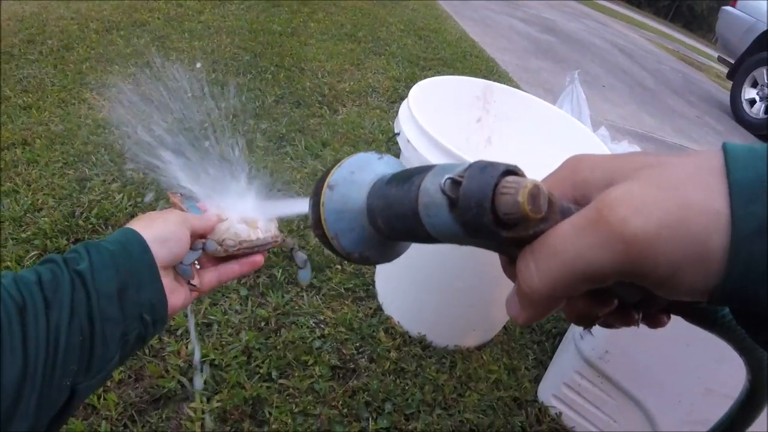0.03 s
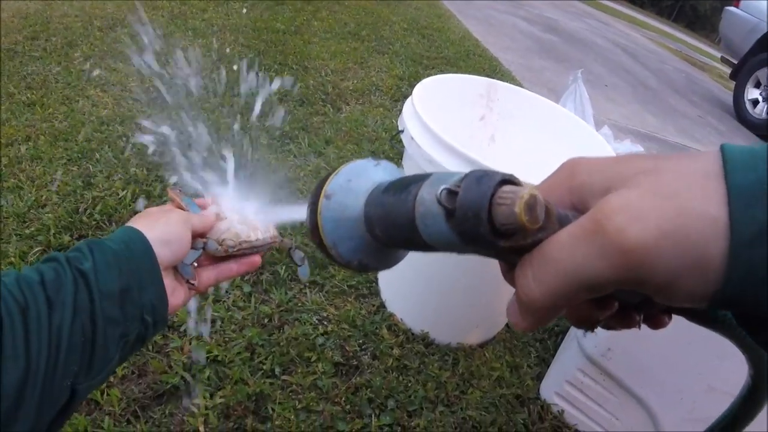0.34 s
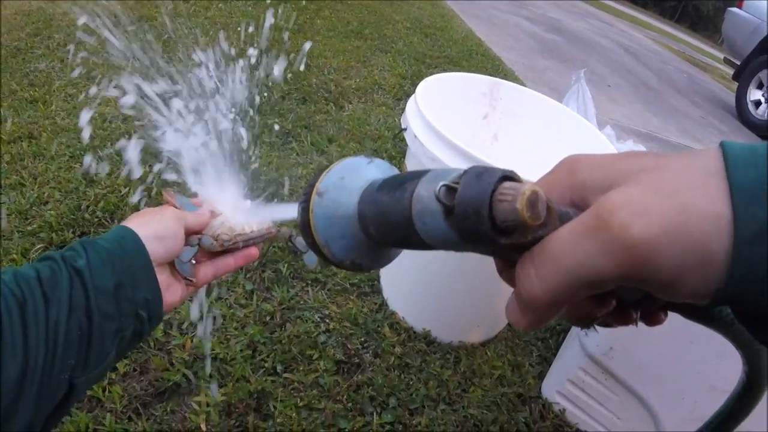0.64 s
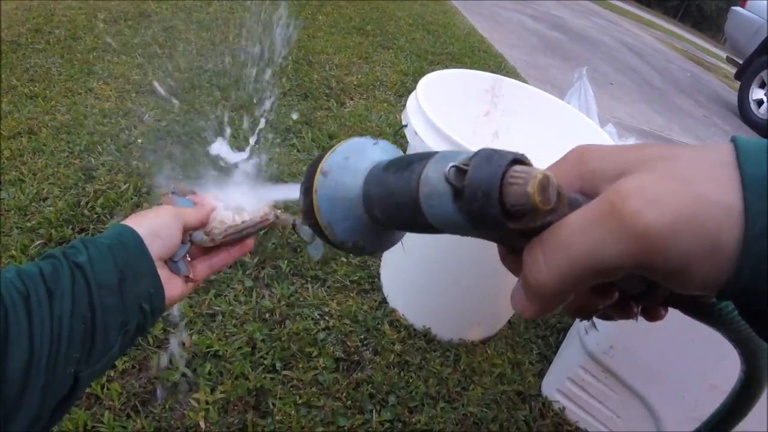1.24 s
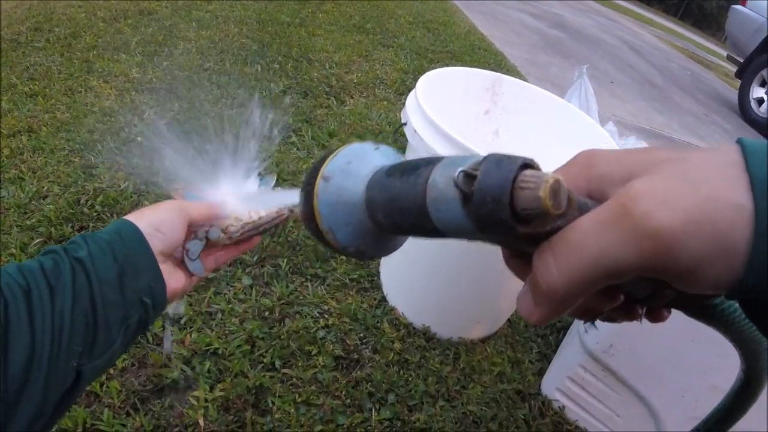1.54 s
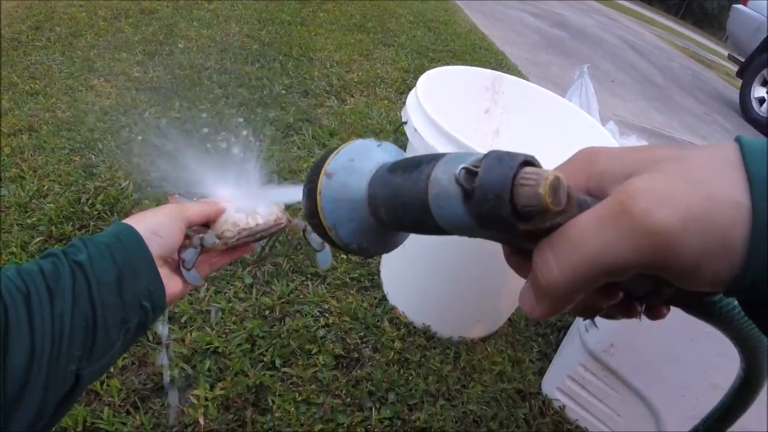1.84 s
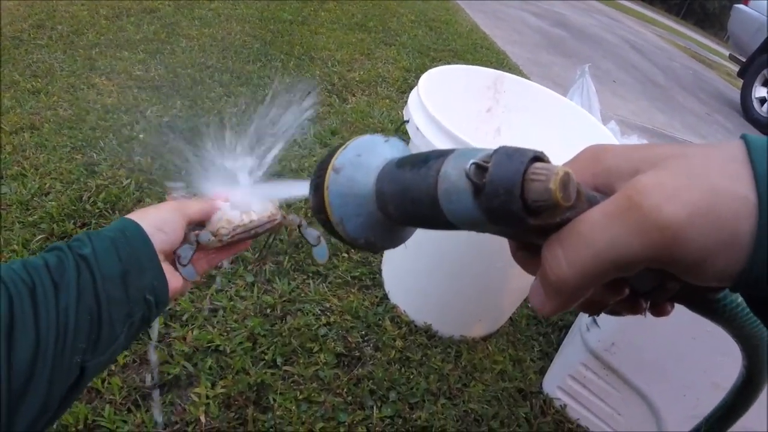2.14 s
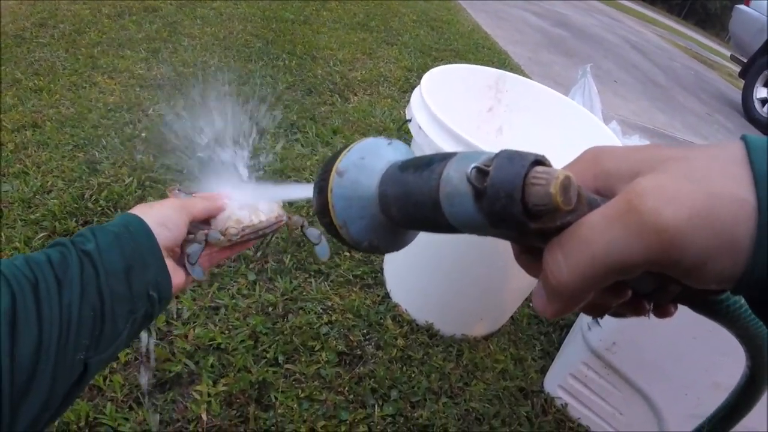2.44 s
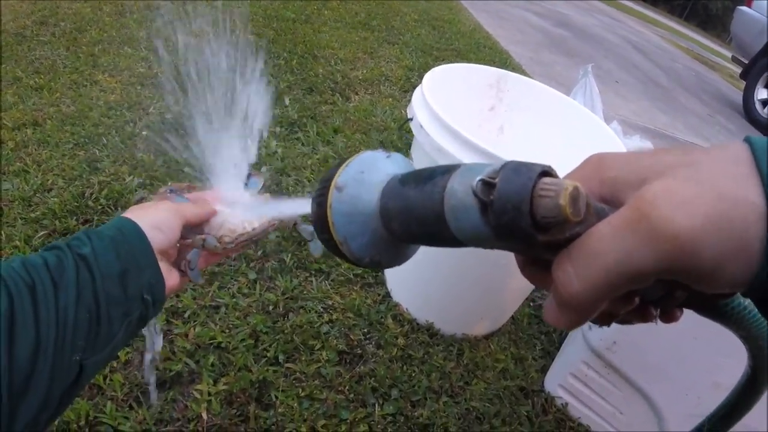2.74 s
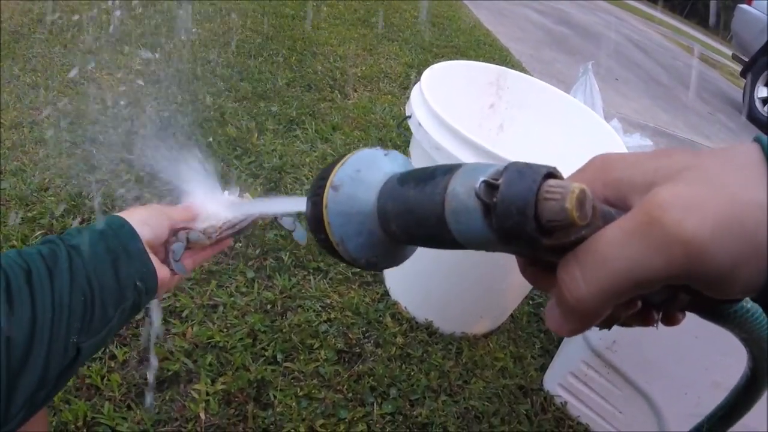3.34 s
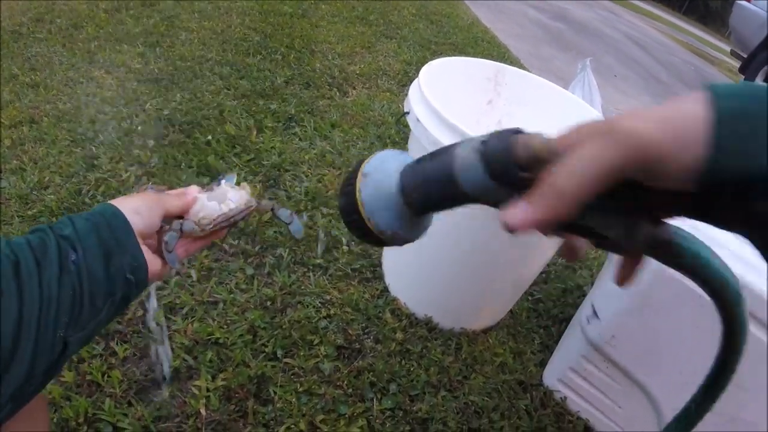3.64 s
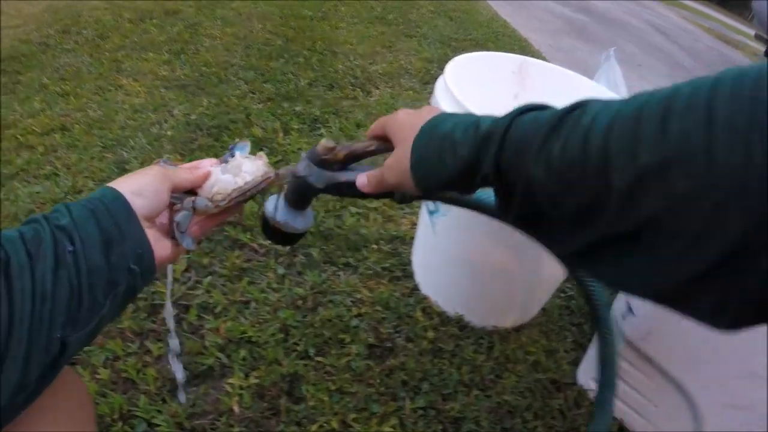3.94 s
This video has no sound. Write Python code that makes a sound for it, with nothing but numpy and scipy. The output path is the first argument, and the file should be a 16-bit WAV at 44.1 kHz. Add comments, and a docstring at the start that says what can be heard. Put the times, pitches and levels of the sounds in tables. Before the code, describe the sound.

Hissing hose water splatters on a crab shell outdoors, stopping with a dull knock.

```python
"""Hosing down a crab

A garden hose, close by, jets water onto a crab held in the hand above a lawn. Dense droplets sizzle
and splatter on the shell, and the sound sags whenever the wagging jet glances off it. Water slaps
the shell and gurgles in the cupped hand. The valve shuts, the handle knocks and the last water
drips away, over a low outdoor drone like a far idling engine. Mono."""
import sys
import numpy as np
from scipy import signal
from scipy.fft import rfft, irfft, next_fast_len
from scipy.io import wavfile
from scipy.ndimage import uniform_filter1d, map_coordinates

SR = 44100
rng = np.random.default_rng(int(sys.argv[2]) if len(sys.argv) > 2 else 0)


def master_out(mix):
    """Clip the mix to full scale and print it as 16-bit PCM to the path in sys.argv[1]."""
    frames = np.transpose(np.atleast_2d(mix))
    ceiling = np.clip(frames, -1, 1)
    pcm = np.round(ceiling * 32767).astype(np.int16)
    wavfile.write(sys.argv[1], SR, pcm)


N = 176400
TIME = np.arange(N) / SR
SHUT_S, TOP_HZ = 3.527, 15500  # when the valve shuts; where the treble ends


def amp(db):
    """Turn decibels into a gain."""
    return 10 ** (np.asarray(db) / 20)


def unit(x):
    """Scale a sound to an average (rms) level of 1."""
    return x / np.sqrt(np.mean(x ** 2) + 1e-20)


def wobble(rate):
    """A smooth random curve through `rate` points a second."""
    return map_coordinates(rng.standard_normal(int(N * rate / SR) + 4), [np.arange(N) * rate / SR])


def filtered(x, response):
    """Scale each frequency in x by response(hz)."""
    size = next_fast_len(N + SR // 2)
    return irfft(rfft(x, size) * response(np.fft.rfftfreq(size, 1 / SR)), size)[:N]


def coloured(x, points):
    """Give x a tone colour that follows (Hz, dB) points."""
    size = 4096
    hz, db = np.transpose(points)
    log_hz = np.log(np.fft.rfftfreq(size, 1 / SR) + 1)
    cepstrum = irfft(np.log(amp(np.interp(log_hz, np.log(hz), db))))
    cepstrum[1:size // 2] *= 2  # folded so the filter rings after a hit, never before
    cepstrum[size // 2 + 1:] = 0
    return signal.fftconvolve(x, irfft(np.exp(rfft(cepstrum))))[:len(x)]


def band(x, low_hz, high_hz, order=20):
    """The part of x between two frequencies, at an average level of 1."""
    below = lambda hz, edge: 1 / (1 + (hz / edge) ** order)
    return unit(filtered(x, lambda hz: below(hz, high_hz) - below(hz, low_hz)))


def droplets(rate, scatter_db, hiss_share):
    """Drops of random size land as clicks, about `rate` a second, over a smooth hiss."""
    size = amp(scatter_db * np.clip(rng.standard_normal(N), -2, 2)) * np.sign(rng.standard_normal(N))
    hits = unit(size * (rng.random(N) < rate / SR))
    return np.sqrt(1 - hiss_share) * hits + np.sqrt(hiss_share) * rng.standard_normal(N)


def bubbles(rate, pitch_hz, spread, cycles, scatter_db):
    """Bubbles ring at random times and pitches, each fading by 60 dB over `cycles` vibrations."""
    count = int(rate * N / SR)
    detune, size = np.hsplit(rng.standard_normal((count, 2)), 2)
    starts = rng.integers(0, N, count)
    hz = np.minimum(pitch_hz * np.exp(spread * detune), TOP_HZ)
    age = np.arange(int(2 * cycles * SR / pitch_hz))  # in samples
    turns = hz * age / SR
    envelope = amp(scatter_db * np.clip(size, -2, 2) - 60 * turns / cycles) * (1 - np.exp(-turns))
    tones = envelope * np.sin(2 * np.pi * turns)
    return unit(np.bincount((starts[:, None] + age).ravel(), tones.ravel(), N)[:N])


# The tone of the outdoor rumble. Each row: frequency in Hz, gain in dB.
RUMBLE_COLOUR = [(25, -30), (80, -32), (108, -27), (128, -9.5), (148, 3.5), (172, 0), (225, -4.5),
                 (275, -6.5), (350, -13), (480, -19), (620, -23), (1200, -28), (3000, -49)]

def drone(rumble_db=-47.5, hum_hz=238, hum_db=-52):
    """A low outdoor rumble with one slightly wavering hum."""
    hum = np.sqrt(2) * np.sin(2 * np.pi * hum_hz * TIME + 0.31 * wobble(4.8))
    rumble = unit(coloured(rng.standard_normal(N), RUMBLE_COLOUR))
    return amp(rumble_db) * rumble + amp(hum_db + 0.72 * wobble(4.4)) * hum


# The tone of water landing on grass. Each row: frequency in Hz, gain in dB.
GRASS_COLOUR = [(300,-15.5), (700,-1), (1100,0), (1500,4.5), (2000,-1), (3000,-2.5), (4300,-6), (5000,2),
                (6300,1.5), (6900,-3), (9000,-8), (10700,-5), (11900,-17), (13200,-15), (15000,-24)]

def runoff(base_db=-61, swell_db=12.5, settle_s=0.1):
    """Water patters and plinks on the grass, most as the jet collapses, then settles."""
    patter = unit(coloured(droplets(rate=3000, scatter_db=2.5, hiss_share=0.31), GRASS_COLOUR))
    plinks = bubbles(rate=900, pitch_hz=5190, spread=0.402, cycles=21, scatter_db=4.5)
    plinks = amp(-2) * unit(coloured(plinks, GRASS_COLOUR))
    swell = np.exp(-np.abs(TIME - SHUT_S) / settle_s)
    return (patter + plinks) * amp(base_db + swell_db * swell)


def handle_knock(start_s=3.634, hz=271, fade_s=0.1, level_db=-33):
    """The nozzle's handle is let go with a dull knock: one low, fast-fading tone."""
    t = np.maximum(TIME - start_s, 0)
    return amp(level_db - 60 * t / fade_s) * np.sin(2 * np.pi * hz * t) * (1 - np.exp(-t / 0.0016))


# The tones of a splat's bright tick and its lower body. Each row: frequency in Hz, gain in dB.
TICK_COLOUR = [(100,-60), (1500,-23.5), (3500,-5), (5200,3), (6300,4), (7200,-7), (10800,-10), (12000,-24),
               (15000,-30)]
BODY_COLOUR = [(100,-45), (500,-18), (1500,-1), (2800,0), (5000,-13), (9000,-40)]

def splats(rows, fade_s, gain_db, body_boost_db=11):
    """Each lump of water lands as a burst of noise: a bright tick with more or less body."""
    out, t = np.zeros(N + SR), np.arange(SR // 10) / SR
    for start, db, body_db in rows:
        burst = rng.standard_normal(len(t)) * amp(-60 * t / fade_s) * (1 - np.exp(-t / 0.00061))
        tick, body = coloured(burst, TICK_COLOUR), coloured(burst, BODY_COLOUR)
        splat = tick / tick.std() + amp(body_db + body_boost_db) * body / body.std()
        out[round(start * SR):][:len(t)] += amp(db + gain_db) * 2 * splat / np.abs(splat).max()
    return out[:N]


# The last drops. Each row: start in seconds, relative level in dB, amount of body in dB.
LAST_DROPS = [(3.577,-37,-23), (3.594,-35,-24), (3.614,-36.5,-16), (3.6531,-37,-15), (3.673,-39,-26),
              (3.711,-39,-29), (3.746,-42,-30), (3.761,-34,-30), (3.785,-41,-23), (3.8112,-40,-24),
              (3.8225,-31,-8), (3.8293,-31,-25), (3.8821,-42,-22), (3.915,-31.5,-33), (3.934,-47,-24)]

def drips():
    """Single drops fall after the valve shuts."""
    return splats(LAST_DROPS, fade_s=0.013, gain_db=-8)


# Big air pockets. Each row: start in seconds, starting pitch in Hz, relative level in dB.
AIR_POCKETS = [(.865,357,-34), (1.65,205,-34), (1.85,433,-35), (2.215,456,-37), (2.356,466,-33)]

def gulps(attack_s=0.011, fade_s=0.11, rise_per_s=0.7):
    """Each air pocket in the cupped hand rings briefly, rising a little in pitch."""
    out, t = np.zeros(N + SR), np.arange(SR // 5) / SR
    for start, hz, db in AIR_POCKETS:
        tone = np.sin(2 * np.pi * hz * t * (1 + rise_per_s * t / 2))
        envelope = 2 * amp(db - 60 * t / fade_s) * (1 - np.exp(-t / attack_s))
        out[round(start * SR):][:len(t)] += envelope * tone
    return out[:N]


# How the gurgle swells and fades. Each row: time in seconds, level in dB before any dips.
GURGLE_LEVELS = [(0, -47), (.6, -48), (.95, -44.5), (1.4, -47.5), (1.9, -45), (2.4, -50), (2.8, -56),
                 (3.5, -71)]

def gurgle():
    """Low bubbles ring in the water held in the cupped hand."""
    bubbling = bubbles(rate=130, pitch_hz=358.5, spread=0.199, cycles=23, scatter_db=3.5)
    return bubbling * amp(np.interp(TIME, *np.transpose(GURGLE_LEVELS)))


# Lumps of water in the jet. Each row: start in seconds, relative level in dB, amount of body in dB.
WATER_LUMPS = [(.5048,-13,-29), (.756,-17,-16), (1.022,-16.5,-17), (1.0715,-21,-13), (1.335,-19,-8),
               (1.609,-15,-14), (1.7953,-20,-22), (2.2049,-12.5,-24), (2.3435,-17,-13), (2.7115,-18,-26),
               (2.9305,-14,21)]

def slaps():
    """Lumps of water slap the shell."""
    return splats(WATER_LUMPS, fade_s=0.015, gain_db=-10.5)


# Moments when the hiss thins to a faint ring. Each row: middle in seconds, length in seconds,
# dB lost by the patter, by the splatter and by the mist, then the ring's level in dB.
THIN_MOMENTS = [(0.509,0.021,33,3.4,5,-37), (0.872,0.023,6,9,6,-35), (1.12,0.029,24,16,13,-31),
                (1.793,0.019,9,11,-2,-45), (1.877,0.019,17,17,6,-41), (2.37,0.022,7,9,6,-33),
                (2.562,0.015,19,5.9,13,-32), (2.835,0.013,20,3,3,-32), (3.093,0.019,23,4,13,-26.5),
                (3.307,.016,2,5.4,1,-33.5)]

def thinnings():
    """The hiss briefly thins: three curves of dB lost, for patter, splatter and mist."""
    return sum(np.outer(losses, np.exp(-(2 * (TIME - middle) / length) ** 4))
               for middle, length, *losses, _ in THIN_MOMENTS)


# The tone of the faint ring. Each row: frequency in Hz, gain in dB.
FAINT_RING_COLOUR = [(1000,-5), (1800,0.5), (4400,2), (6300,5.5), (7000,-17), (11000,-9)]

def rings(low_hz=1105, spacing_hz=468, scatter=0.22, count=21):
    """A ladder of unevenly spaced tones sounds while the hiss is thin."""
    out, t = np.zeros(N), np.arange(-SR // 20, SR // 20) / SR
    for middle, length, *_, ring_db in THIN_MOMENTS:
        detune, size, phase = rng.standard_normal((3, count))
        hz = low_hz + spacing_hz * (np.arange(count) + scatter * detune)
        gains = amp(np.interp(hz, *np.transpose(FAINT_RING_COLOUR)) + 3.2 * size)
        tones = gains @ np.sin(2 * np.pi * (hz[:, None] * t + phase[:, None]))
        envelope = amp(ring_db) * np.exp(-(1.4 * t / length) ** 4)
        out[round((middle + t[0]) * SR):][:len(t)] += envelope * unit(tones)
    return out


# The jet glances off the shell. Each row: middle in seconds, length in seconds, dip in the sizzle in dB.
GLANCE_DIPS = [(0.057,0.059,6), (0.198,0.047,4), (0.323,0.042,5.5), (0.744,0.034,6.5), (0.899,0.038,6),
               (1.048,0.047,13), (1.239,0.055,7.5), (1.413,0.12,4.5), (1.625,0.044,9.5), (1.777,0.043,9.5),
               (1.893,0.067,4), (2.027,0.041,9), (2.182,0.043,17), (2.327,0.04,14), (2.462,0.056,4.5),
               (2.617,0.05,4.5)]

def glances(off_steepness=2.6, back_steepness=3.9):
    """The dB lost as the jet slides off the shell and snaps back."""
    loss_db = np.zeros(N)
    for middle, length, depth_db in GLANCE_DIPS:
        distance = np.minimum(np.abs(2 * (TIME - middle) / length), 10)
        steepness = np.where(TIME < middle, off_steepness, back_steepness)
        loss_db += depth_db * np.exp(-distance ** steepness)
    return loss_db


def water_film(x, depth_db):
    """Patches of the tone swell and fade as the film of water changes shape."""
    spectrum = signal.stft(x, nperseg=512)[2]
    patches = uniform_filter1d(rng.standard_normal(spectrum.shape), size=5, axis=0)  # smooth in pitch
    patches = uniform_filter1d(patches, size=18, axis=1)  # smooth in time
    return signal.istft(spectrum * amp(depth_db * unit(patches)), nperseg=512)[1][:N]


# Where the wet shell resonates. Each row: time in seconds, frequency in Hz.
SHELL_PITCH = [(0,2300), (.3,2080), (.55,2600), (.7,2450), (.85,1970), (1.05,2420), (1.3,2600), (1.5,3760),
               (1.7,2460), (1.9,2630), (2.03,3800), (2.13,3750), (2.25,2630), (2.55,2300), (2.8,3000),
               (3.08,2200), (3.3,2900), (3.5,2260)]

def shell(x, lift_db=0.5, width_octaves=0.23):
    """The shell slightly lifts a narrow band, which moves with the spot the jet hits."""
    hz, times, spectrum = signal.stft(x, SR, nperseg=512)
    octaves_away = np.log2((hz[:, None] + 1) / np.interp(times, *np.transpose(SHELL_PITCH)))
    lift = amp(lift_db * np.exp(-(octaves_away / width_octaves) ** 2))
    return signal.istft(spectrum * lift, nperseg=512)[1][:N]


# The tone of the spray. Each row: frequency in Hz, gain in dB.
SPRAY_COLOUR = [(120, -28), (200, -9), (235, -8.5), (267, -13), (452, -9.5), (807, -15.5), (1160, -10),
                (1320, -17.5), (1420, -11.5), (1760, -6.5), (2480, -6), (2980, -7), (3260, -13),
                (3680, -4.5), (4200, -8), (5220, 2.5), (5920, 3), (6260, 2.5), (6970, -16), (7770, -9.5),
                (8990, -16.5), (10800, -12.5), (11800, -28), (13400, -23), (15200, -26.5)]
# The jet's loudness before any dips. Each row: time in seconds, then sizzle, splatter and mist in dB.
JET_LEVELS = [(0.0,-28.5,-32,-37), (0.16,-27.5,-36,-38), (0.28,-28.5,-32,-37.5), (0.48,-28.5,-34,-38),
              (0.57,-28,-31,-39.5), (0.82,-26.5,-32,-36.5), (1.1,-27,-34.5,-38.5), (1.35,-29,-34,-38),
              (1.55,-28.5,-37,-37), (1.9,-30,-37.5,-37), (2.15,-27,-34,-37.5), (2.5,-28.5,-34.5,-38),
              (2.75,-26,-29.5,-38.5), (2.95,-28,-29.5,-39.5), (3.04,-27,-34,-34.5), (3.11,-28,-32.5,-40),
              (3.2,-32.5,-35.5,-40), (3.32,-29.5,-33.5,-36.5), (3.5,-31.5,-36,-40.5)]

def jet(patter_top_hz=1400, splatter_top_hz=4420, sizzle_top_hz=7090, shut_db_per_s=488):
    """Droplets drum on the shell, from low patter to fine mist; the valve cuts them and the gurgle off."""
    times, *levels = np.transpose(JET_LEVELS)
    sizzle_db, splatter_db, mist_db = (np.interp(TIME, times, level) for level in levels)
    patter_db = -42 + 0.19 * (splatter_db - splatter_db.mean())
    glance_db = glances()
    thin_patter_db, thin_splatter_db, thin_mist_db = thinnings()
    flow_db = 0.2 * wobble(35.6) - shut_db_per_s * np.clip(TIME - SHUT_S, 0, 1)
    impacts = droplets(rate=5000, scatter_db=5, hiss_share=0.29)
    clumps = amp(wobble(330))  # the jet breaks into lumps
    spray = coloured(impacts * clumps, SPRAY_COLOUR)
    hollow, bright = water_film(spray, depth_db=2.0), water_film(spray, depth_db=1.25)
    patter = band(hollow, 185, patter_top_hz) * amp(patter_db - 0.77 * glance_db - thin_patter_db)
    splatter = band(shell(hollow), patter_top_hz, splatter_top_hz)
    splatter *= amp(splatter_db - glance_db - thin_splatter_db)
    sizzle = band(bright, splatter_top_hz, sizzle_top_hz) * amp(sizzle_db - glance_db)
    mist = band(bright, sizzle_top_hz, TOP_HZ) * amp(mist_db - 0.87 * glance_db - thin_mist_db)
    gurgling = gurgle() * amp(-0.16 * glance_db - 0.5 * thin_patter_db)
    return amp(flow_db) * (patter + splatter + sizzle + mist + gurgling)


def scene():
    """All the sources together, the same in both channels."""
    spray = jet()
    faint_ringing = rings()
    water = spray + gulps() + slaps() + runoff() + drips()
    return np.tile(water + faint_ringing + handle_knock() + drone(), (2, 1))


def record(dry):
    """Cut away the highest treble."""
    return np.array([filtered(channel, lambda hz: hz < TOP_HZ) for channel in dry])


dry = scene()
out = record(dry)
master_out(out)
```